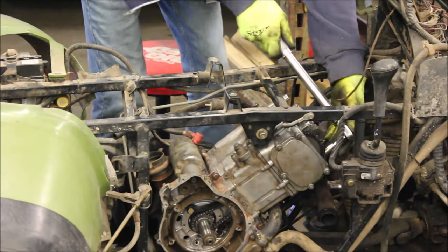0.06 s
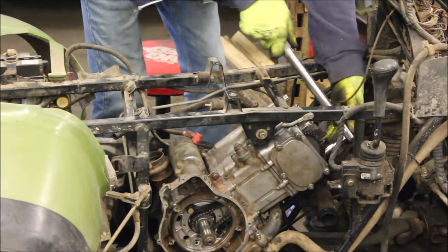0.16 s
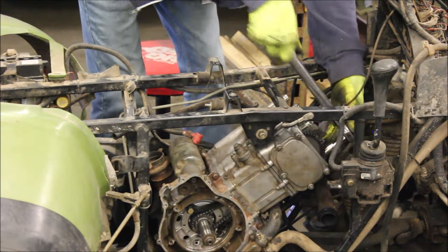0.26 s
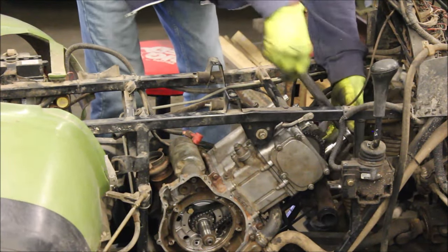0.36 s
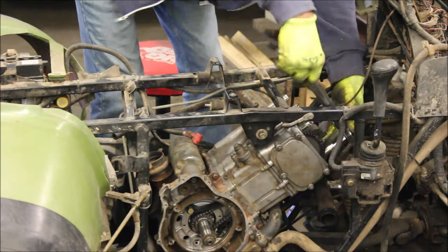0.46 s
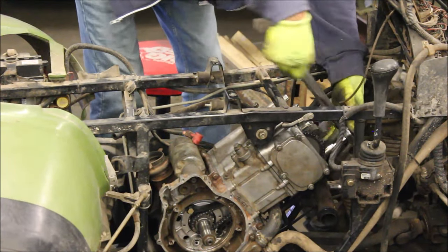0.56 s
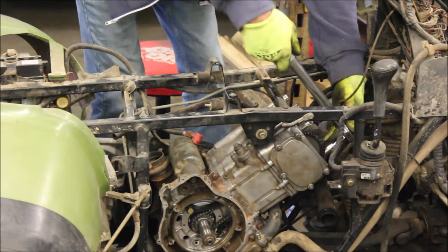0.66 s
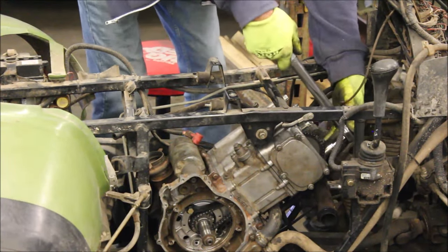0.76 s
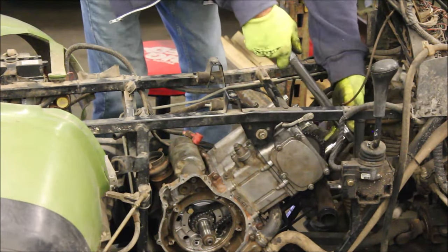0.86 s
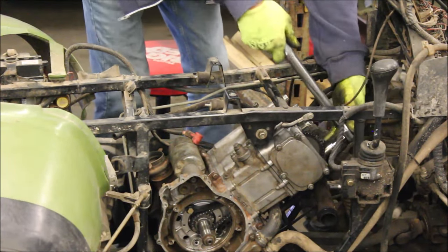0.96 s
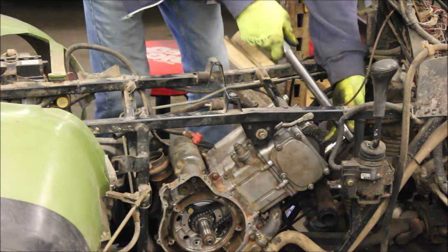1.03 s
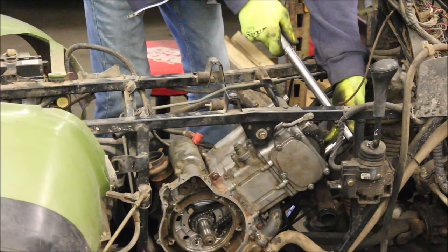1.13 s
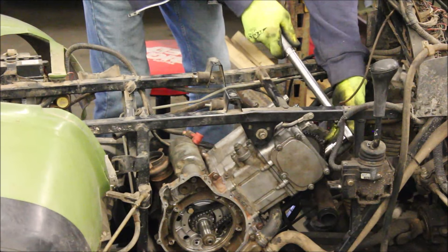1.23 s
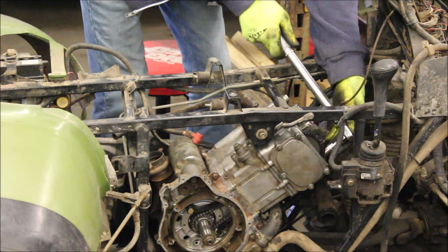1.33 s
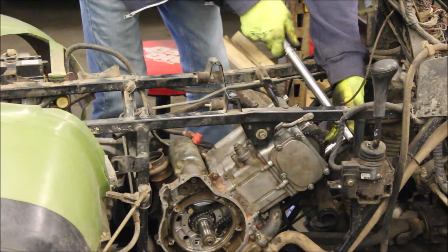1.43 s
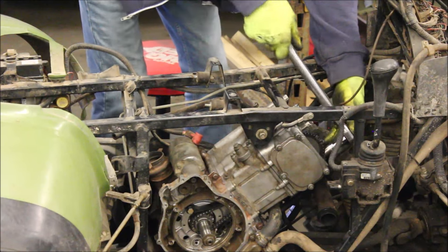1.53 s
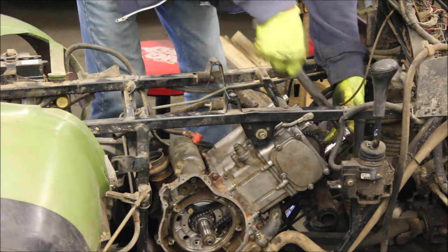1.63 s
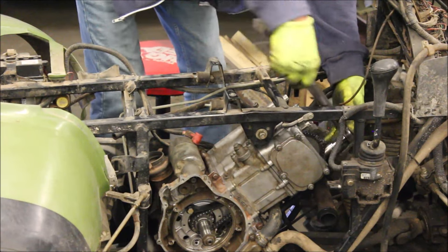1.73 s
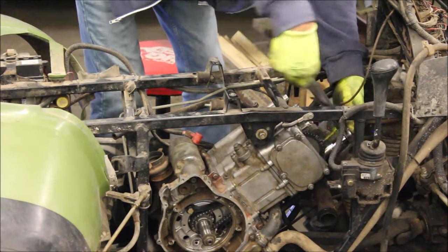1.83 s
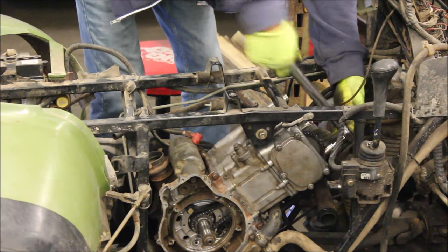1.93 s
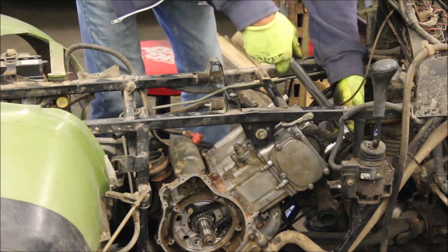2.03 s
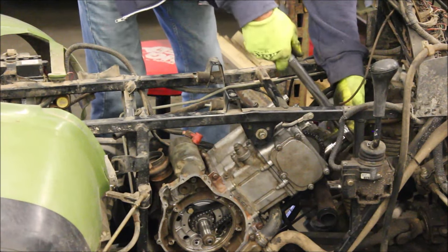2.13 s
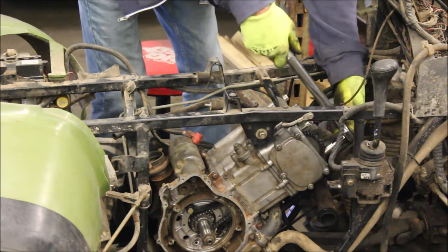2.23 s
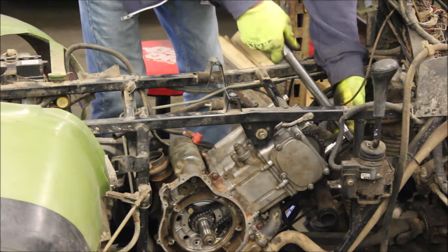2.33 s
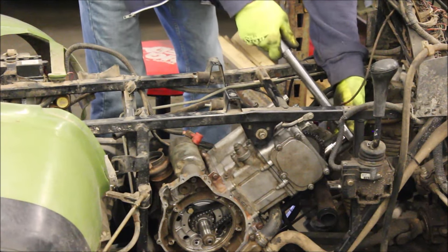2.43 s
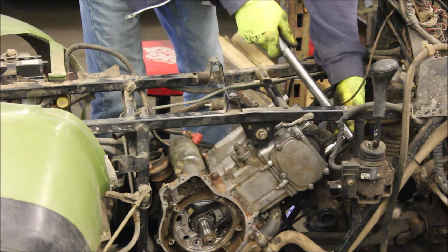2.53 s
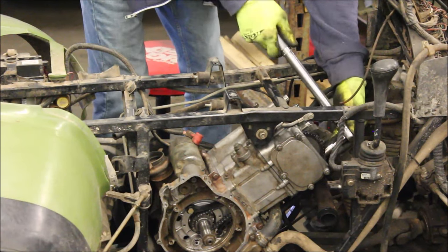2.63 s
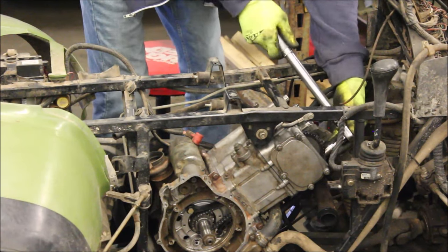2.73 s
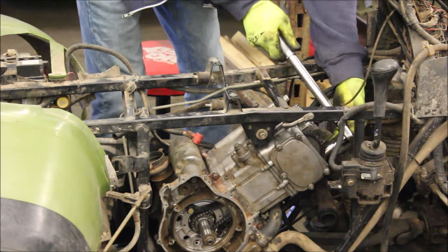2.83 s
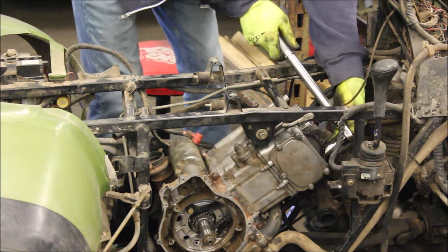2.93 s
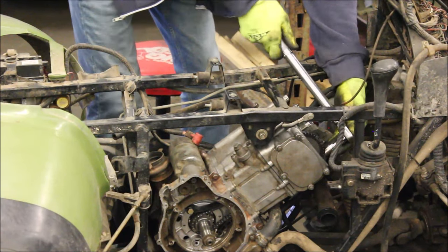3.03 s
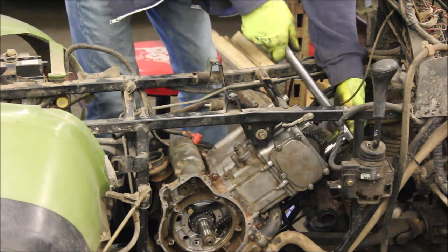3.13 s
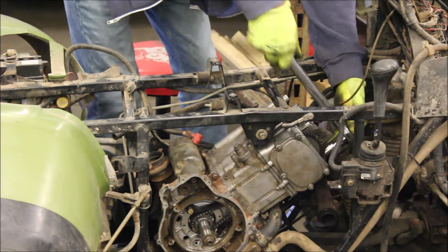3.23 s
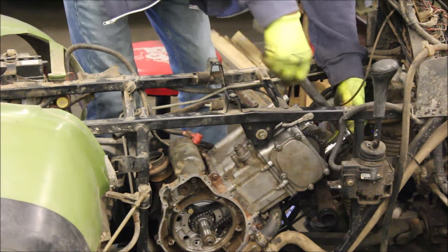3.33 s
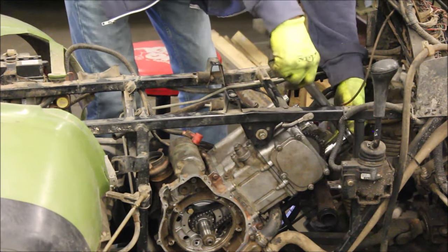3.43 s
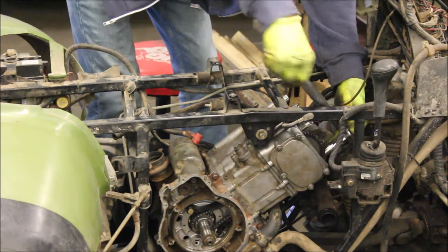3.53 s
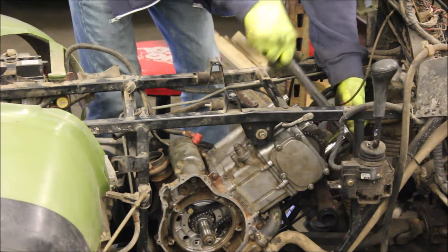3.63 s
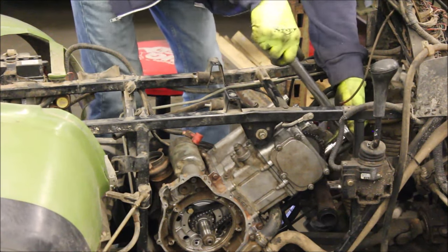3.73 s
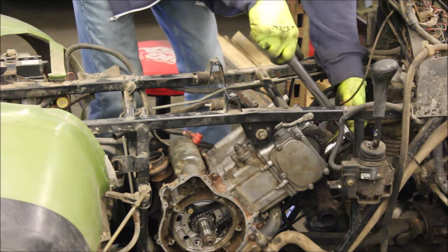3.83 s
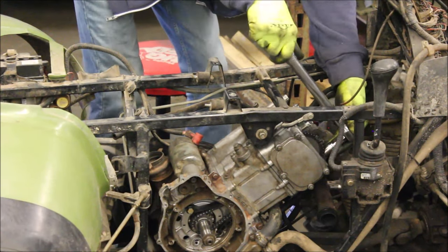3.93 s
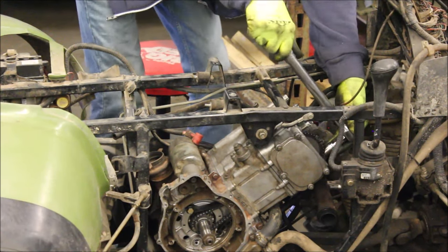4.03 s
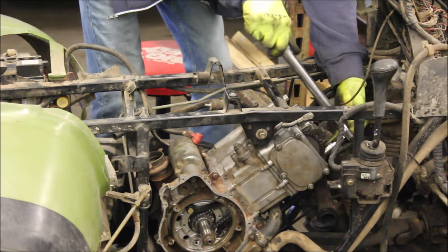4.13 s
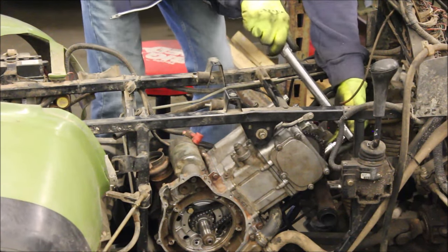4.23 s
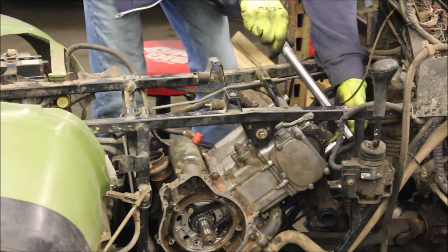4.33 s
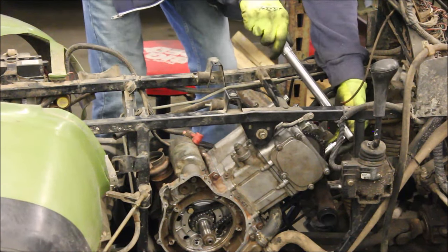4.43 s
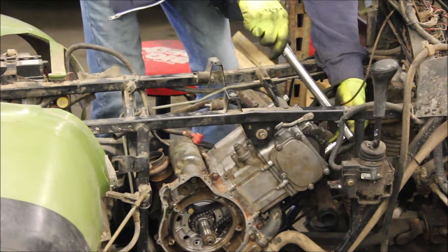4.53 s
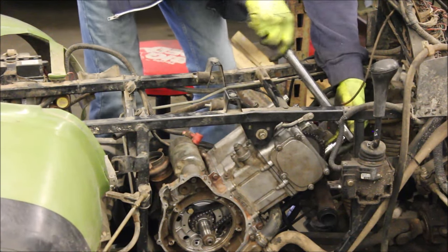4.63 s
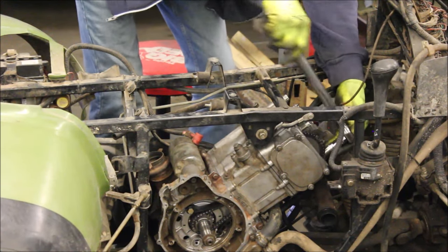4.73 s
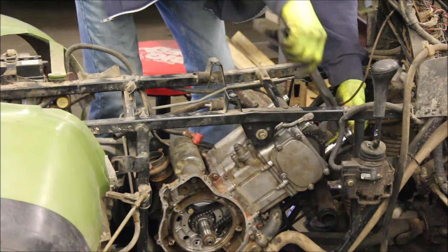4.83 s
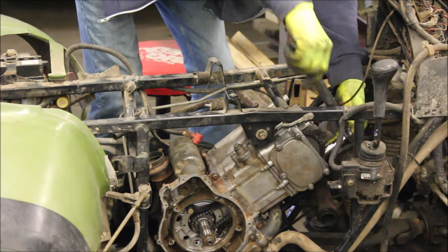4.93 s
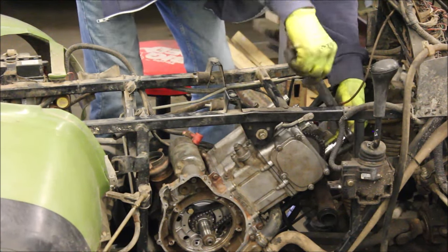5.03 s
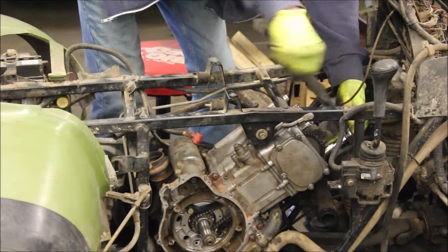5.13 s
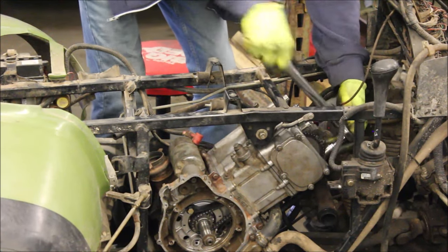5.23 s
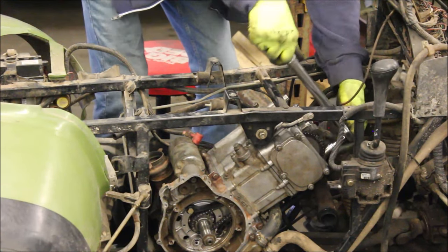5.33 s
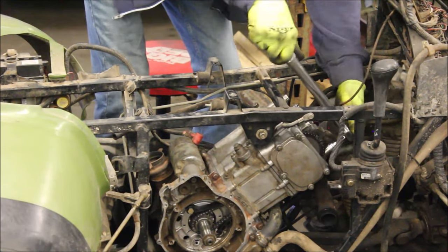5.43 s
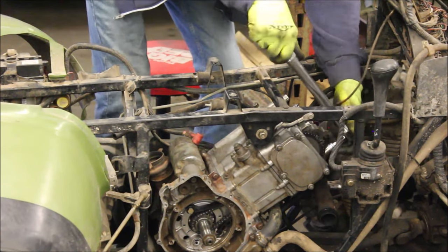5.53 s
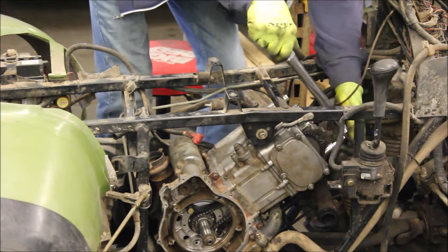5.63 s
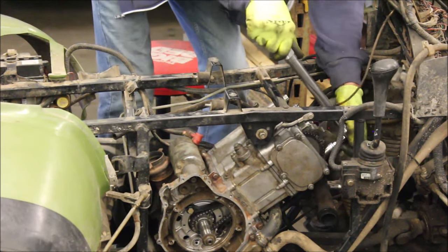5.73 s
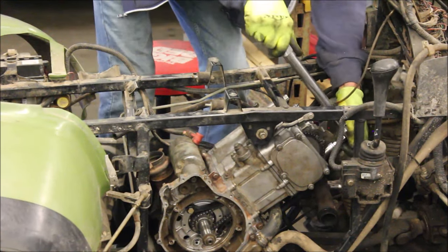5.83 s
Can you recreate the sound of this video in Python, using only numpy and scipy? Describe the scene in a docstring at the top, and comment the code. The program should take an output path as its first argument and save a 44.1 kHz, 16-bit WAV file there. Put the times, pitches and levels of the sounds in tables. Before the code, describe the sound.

A torque wrench gives four loud metallic clacks on an engine bolt, with ratchet ticks, socket clinks and snap-backs ringing in a hard-walled garage.

```python
"""A click-type torque wrench breaks over four times on an engine bolt in a hard-walled garage.
Each loud click is a cluster of broadband impacts that sets the modes of engine and frame ringing.
Before it the socket clinks and the ratchet ticks; after it the wrench snaps back as the hand lets go:
lighter impacts with ringing steel. Shaped noise gives the walls' reverberation, the rubbing of
sleeves and gloves and a steady hiss; wavering sinusoids give a quiet electric hum."""
import sys
import numpy as np
from scipy import signal
from scipy.fft import rfft, irfft
from scipy.io import wavfile
from scipy.ndimage import uniform_filter1d

SR = 44100
rng = np.random.default_rng(int(sys.argv[2]) if len(sys.argv) > 2 else 0)


def to_wav(s):
    """Save 16-bit WAV."""
    ch = np.atleast_2d(s).T  # columns
    pcm = np.round(np.clip(ch, -1, 1) * 32767)  # PCM
    wavfile.write(sys.argv[1], SR, pcm.astype(np.int16))


N = 258867  # length in samples

# Event levels are relative to those in scene(); rubbing and hum levels are absolute.
# the wrench breaks over: start_s, level_db, treble_tilt_db_per_octave, engine_ring_db, frame_knock_db
BREAKS = [(0.466, 1.5, -1, -3, 3), (1.7837, 0, -0.5, -4.5, -5), (3.4636, -1.5, -0.34, -5, -4.5),
          (5.0117, -1.5, -1.5, -4.5, -5)]
# the wrench snaps back, sometimes in two steps: start_s, level_db, treble_tilt_db_per_octave, tube_ring_db
RESETS = [(0.6807, 2, 2.5, 2), (0.6966, 4.5, -3, -1), (1.9968, 3, -1.5, 2), (3.6500, -1.5, -5.5, -2),
          (3.675, -1.5, 1, 1), (5.2845, 4.5, -0.5, 6)]
# the socket clinks on the bolt: start_s, level_db, treble_tilt_db_per_octave
CLINKS = [(0.1517, 1.5, 5.5), (1.4558, 0.5, 2.5), (2.6975, -12, -3.5), (2.809, -14, -4.5),
          (3.0628, -1.5, 2.5), (4.2391, -5, 2.5), (4.6437, -2, 2.5)]


def break_clicks(level_db, touch_db, lag_s, touch_chatter_s, blow_chatter_s,
                 rattle_db, rattle_lag_s, rattle_chatter_s):
    """Successive impacts: the toggle slips, slams into the wall of the tube, and the joints rattle."""
    # colour of the break: frequency_hz, level_db
    break_tone = [(25, -42), (60, -23.5), (190, -12.5), (260, 3), (450, 1), (720, 1.5), (820, -7),
                  (1180, 7), (1380, -2.5), (1750, 7.5), (2400, 5), (3800, -3.5), (5800, -14.5),
                  (10500, -20), (15500, -38.5)]
    out = np.zeros((2, N))
    for start_s, db, tilt_db, _, _ in BREAKS:
        touch = strike(break_tone, tilt_db + 2.5, touch_chatter_s, pivot_hz=2900)
        blow = strike(break_tone, tilt_db, blow_chatter_s, pivot_hz=2640)
        rattle = strike(break_tone, tilt_db + .5, rattle_chatter_s, pivot_hz=2000)
        add(out, start_s, amp(level_db + db + touch_db) * touch)
        add(out, start_s + lag_s, amp(level_db + db) * blow)
        add(out, start_s + rattle_lag_s, amp(level_db + db + rattle_db) * rattle)
    return out


def ringing(engine_db, frame_db):
    """Free vibration: the modes of engine and frame ring on after each break."""
    # modes of the engine: frequency_hz, level_db, t60_s
    engine_modes = [(228, -14, .6), (258, -13, .6), (340, -9, .55), (397, 0, .5), (402, -9, .4),
                    (487, -11, .45), (648, -11, .45), (705, -1, .5), (728, -11, .4), (1122, -11, .4),
                    (1242, -11, .4), (1722, -8, .4), (1947, -7, .4), (2064, -11, .4), (2144, -11, .4),
                    (2282, -6, .45), (2500, -10, .45), (3320, -18, .35), (4800, -24, .3), (5190, -25, .3),
                    (7690, -28, .3)]
    # modes of the frame: frequency_hz, level_db, t60_s
    frame_modes = [(128, -12, .5), (162, -7, .5), (868, 0, .45), (903, -2, .35), (932, -4, .35),
                   (1545, -1, .35), (1602, -1, .35)]
    out = np.zeros((2, N))
    for start_s, _, _, ring_db, knock_db in BREAKS:
        add(out, start_s, amp(engine_db + ring_db) * ring(engine_modes, rise_s=.004, scatter_db=1.5))
        add(out, start_s, amp(frame_db + knock_db) * ring(frame_modes, rise_s=.002, scatter_db=1))
    return out


def strike(tone, tilt_db, chatter_s, pivot_hz, size=4096):
    """Impact excitation: a short burst of contacts is filtered by the response of the steel parts."""
    # sound straight from the wrench, microphone difference against common part: frequency_hz, side_minus_mid_db
    direct_side = [(100, -24), (300, -23), (1000, -17), (2200, -15), (4500, -14), (8000, -11), (14000, -12)]
    ripple_db, ripple_from_hz = 2, 3200
    t, hz = np.arange(size) / SR, abs(np.fft.fftfreq(size, 1 / SR))
    envelope = np.sqrt(t) * np.exp(-t / chatter_s)
    burst = np.fft.fft(rng.standard_normal((2, size)) * envelope)
    force = burst / abs(burst)  # equal at every frequency
    contacts = np.fft.ifft(pair(force, hz, direct_side)).real[:, :size // 2]
    # every blow favours the many small resonances of the steel differently
    knots = np.linspace(0, SR / 2, num=180)
    ripple = np.interp(hz, knots, rng.standard_normal(len(knots)))
    ripple = ripple * np.minimum(hz / ripple_from_hz, 1) ** 2
    octaves = np.log2(np.maximum(hz, 500) / pivot_hz)
    gain = amp(read(tone, hz) + tilt_db * octaves + ripple_db * ripple)
    # minimum phase makes the response causal
    spectrum = np.exp(np.conj(signal.hilbert(np.log(gain))))
    colour = np.fft.ifft(spectrum).real[:size // 2]
    return signal.fftconvolve(contacts, colour[None], axes=1)


def ring(modes, rise_s, scatter_db):
    """Modal superposition: damped sinusoids share the force of each blow a little differently."""
    t, out = np.arange(SR) / SR, 0
    luck_and_phase = rng.standard_normal((len(modes), 2))
    for (hz, db, t60_s), (luck, phase_cycles) in zip(modes, luck_and_phase):
        decay = np.exp(-np.log(1000) * t / t60_s)
        out = out + amp(db + scatter_db * luck) * decay * np.sin(2 * np.pi * (hz * t + phase_cycles))
    return out * (1 - np.exp(-t / rise_s))


def clicks(rows, tone, level_db, chatter_s):
    """Impact excitation: one light strike for each row."""
    out = np.zeros((2, N))
    for start_s, db, tilt_db, *_ in rows:
        add(out, start_s, amp(level_db + db) * strike(tone, tilt_db, chatter_s, pivot_hz=2620))
    return out


def teeth():
    """Pawl kinematics: the handle is drawn back and slows, so most swings tick at growing intervals.

    Each row is start_s, level_db, treble_tilt_db_per_octave, ring_hz, ring_db.
    """
    # pulls of the handle, two in the first swing: first_tick_s, teeth, first_interval_s,
    # interval_growth_per_tooth (ratio), level_db, strongest_ring_hz, ring_db
    swings = [(0.2700, 3, .0372, 1.135, 1.3, 3740, 7), (0.4050, 2, .0465, 1, -1.2, 2690, -3),
              (1.5980, 5, .0397, 1.083, 1.2, 3700, -3), (3.2085, 4, .0484, 1.11, 1.4, 2670, 2),
              (4.8360, 3, .063, 1.328, -0.8, 2820, -5)]
    ring_fade_db, tilt_db = -3.5, -1.2  # per tooth; per octave
    rows = []
    for start_s, count, interval_s, growth, db, hz, ring_db in swings:
        for k in range(count):
            rows.append((start_s, db, tilt_db, hz, ring_db + ring_fade_db * k))
            start_s = start_s + interval_s * growth ** k
    return rows


def ratchet(level_db, chatter_s, seat_db, seat_lag_s, seat_tilt_db, seat_chatter_s):
    """Double impact: each drop of the pawl is followed by a lighter, brighter tap as it seats."""
    # colour of a tick: frequency_hz, level_db
    tick_tone = [(60, -33), (300, -24), (900, -12), (1700, -2.5), (2700, 2), (3200, 0.5), (3750, 4.5),
                 (5800, -0.5), (7000, 4.5), (8300, -4.5), (10500, -2.5), (13000, -10.5), (15800, -20)]
    seats = [(start_s + seat_lag_s, db + seat_db, tilt_db + seat_tilt_db)
             for start_s, db, tilt_db, *_ in teeth()]
    drops = clicks(teeth(), tick_tone, level_db, chatter_s)
    return drops + clicks(seats, tick_tone, level_db, seat_chatter_s)


def ratchet_rings(level_db):
    """Free vibration: the modes of the ratchet head ring after each tick."""
    # modes of the ratchet head: frequency_hz, level_db, t60_s
    head_modes = [(2660, -4, .09), (3735, -2, .14), (5100, -5, .08), (7030, -4, .1), (10420, -9, .1)]
    out = np.zeros((2, N))
    for start_s, db, *_ in teeth():
        add(out, start_s, amp(level_db + db) * ring(head_modes, rise_s=.0004, scatter_db=3.5))
    return out


def grip_pings(level_db, t60_s):
    """Boundary conditions: the grip changes from swing to swing, so each favours another resonance."""
    out = np.zeros((2, N))
    for start_s, _, _, hz, db in teeth():
        add(out, start_s, ring([(hz, level_db + db, t60_s)], rise_s=.0004, scatter_db=1.5))
    return out


def snap_backs(level_db, chatter_s, rattle_db, rattle_chatter_s):
    """Released spring energy: the toggle snaps home and the slack joints rattle on briefly."""
    # colour of a snap back: frequency_hz, level_db
    reset_tone = [(40, -37), (200, -8.5), (1000, -3), (3000, -0.5), (4500, -3), (6500, -9.5), (9000, -14),
                  (10500, -13), (15500, -30)]
    snaps = clicks(RESETS, reset_tone, level_db, chatter_s)
    return snaps + clicks(RESETS, reset_tone, level_db + rattle_db, rattle_chatter_s)


def tube_rings(level_db, t60_s):
    """Free vibration: each snap back rings the resonances of the wrench's tube."""
    # resonances of the tube: frequency_hz, width_hz (not used), level_db
    tube_modes = [(2620, 30, 6), (3070, 28, -1), (3370, 180, 1), (4230, 150, 2), (5180, 50, -8),
                  (5850, 95, -9)]
    modes = [(hz, mode_db, t60_s) for hz, _, mode_db in tube_modes]
    out = np.zeros((2, N))
    for start_s, db, _, ring_db in RESETS:
        add(out, start_s, amp(level_db + db + ring_db) * ring(modes, rise_s=.00044, scatter_db=2))
    return out


def socket(level_db, chatter_s, touch_db, touch_tilt_db, touch_lead_s):
    """Take-up of slack: a light, bright touch of the socket on the bolt, then the clink."""
    # colour of a clink: frequency_hz, level_db
    clink_tone = [(300, 0.5), (900, 6.5), (1450, 8.5), (2100, 4), (4000, -4.5), (5800, -16.5), (9000, -26),
                  (10200, -19), (12000, -41), (15500, -52)]
    touches = [(start_s - touch_lead_s, db + touch_db, tilt_db + touch_tilt_db)
               for start_s, db, tilt_db in CLINKS]
    return clicks([*CLINKS, *touches], clink_tone, level_db, chatter_s)


def socket_rings(level_db):
    """Free vibration: the modes of the socket ring after each clink."""
    # modes of the socket: frequency_hz, level_db, t60_s
    socket_modes = [(1437, 0, .15), (1700, -6, .13), (2471, -9, .17), (2767, -5, .22), (3844, -18, .25),
                    (4140, -13, .15), (9878, -17, .17)]
    out = np.zeros((2, N))
    for start_s, db, _ in CLINKS:
        add(out, start_s, amp(level_db + db) * ring(socket_modes, rise_s=.001, scatter_db=1))
    return out


def crossfaded(x, turns_per_s, count=3):
    """Crossfaded sends: the sound is passed in turn to several reverberation tails."""
    turn = np.arange(N) / SR * turns_per_s
    return [x * np.sin(np.pi / 2 * np.minimum((turn + k) % count, 2)) for k in range(count)]


def garage(x, build_s, early_db, early_decay_s, size=65536):
    """Diffuse reverberation: a noise tail builds up, then dies at its own speed in each band."""
    # reverberation time: frequency_hz, t60_s
    room_t60 = [(120, 0.78), (400, 0.95), (1000, 0.92), (2200, 1.0), (4500, 0.78), (8000, 0.58),
                (15000, 0.27)]
    # level of the tail: frequency_hz, level_db
    room_db = [(120, 9.5), (400, 5), (1000, 1.5), (2200, 0.5), (4500, 2.5), (8000, -1), (15000, -7)]
    # sound from the walls, microphone difference against common part: frequency_hz, side_minus_mid_db
    room_side = [(100, -21), (300, -24), (600, -12.5), (1100, -12), (2200, -6), (4500, -5.5), (7500, -1.5),
                 (11000, 2)]
    t = np.arange(size) / SR
    near_walls = 1 + amp(early_db) * np.exp(-t / early_decay_s)  # they answer strongest
    swell = (1 - np.exp(-t / build_s)) * near_walls
    hz, age_s, bands = signal.stft(rng.standard_normal((2, size)) * swell, SR, nperseg=256)
    bands = bands * np.exp(-np.log(1000) * age_s / read(room_t60, hz)[:, None])
    tail = rfft(signal.istft(bands, SR, nperseg=256)[1][:, :size])
    hz = np.fft.rfftfreq(size, 1 / SR)
    # smooths the tail's fine spectrum, so the reverberation has an even colour
    tail = tail / np.sqrt(uniform_filter1d(abs(tail) ** 2, size=41))
    tail = irfft(pair(tail, hz, room_side) * amp(read(room_db, hz)), size)[:, :SR]
    return signal.fftconvolve(x.mean(0)[None], tail, axes=1)[:, :N]


def rubbing(grain_db):
    """Stick-slip friction: cloth noise swells with each arm move and catches in small uneven grains."""
    # colour of the cloth: frequency_hz, level_db
    rub_tone = [(150, 4), (500, 0.5), (1200, -3), (2800, -6), (6000, -16.5), (11000, -22.5), (15500, -56)]
    # moves of sleeves and gloves: middle_s, half_length_s, level_db
    rubs = [(0.15, .35, -55), (1.05, 0.22, -54.5), (2.052, 0.43, -57.5), (2.773, 0.08, -57.5),
            (3.13, 0.093, -52.5), (4.24, 0.064, -50), (4.25, 0.21, -54.5)]
    rest_db = -63.5  # the cloth is never quite still
    t = np.arange(N) / SR
    grain = evened(uniform_filter1d(rng.standard_normal(N), size=400))
    power = amp(rest_db) ** 2
    for middle_s, half_s, db in rubs:
        power = power + amp(db) ** 2 * np.exp(-((t - middle_s) / half_s) ** 2)
    return noise(N, rub_tone) * np.sqrt(power) * amp(grain_db * grain)


def background(hiss_db, waver_rad):
    """Stationary noise and phase modulation: a steady hiss and a slightly wavering mains hum."""
    # colour of the hiss, strongest in the bass: frequency_hz, level_db
    hiss_tone = [(12, -44), (25, -22), (45, -11), (90, -5.5), (122, -10.5), (202, -12), (245, -8.5),
                 (324, -10), (362, -8), (452, -15.5), (597, -20), (686, -14.5), (1340, -18), (1670, -20.5),
                 (5230, -27), (15500, -37.5)]
    # partials of the hum: frequency_hz, rms_level_db
    hum_partials = [(60, -71.5), (119.5, -64), (296, -95), (360, -64.5), (598, -73.5), (840, -74.5),
                    (1260, -72)]
    t, knots = np.arange(N) / SR, np.linspace(0, N / SR, num=30)
    hum = 0
    for hz, db in hum_partials:
        phase = waver_rad * np.interp(t, knots, rng.standard_normal(len(knots)))
        hum = hum + amp(db) * np.sin(2 * np.pi * hz * t + phase)
    return amp(hiss_db) * noise(N, hiss_tone) + np.sqrt(2) * hum


def noise(size, tone):
    """Shaped stereo noise: a wide steady hiss, little alike in the two channels above the bass."""
    # difference of the channels against their common part: frequency_hz, side_minus_mid_db
    noise_side = [(50, -16), (150, -1.5), (300, -4), (600, -1), (15000, 1)]
    hz = np.fft.rfftfreq(size, 1 / SR)
    spectra = pair(rfft(rng.standard_normal((2, size))), hz, noise_side)
    return evened(irfft(spectra * amp(read(tone, hz)), size))


def pair(z, hz, width):
    """Mid-side stereo: two unrelated spectra become common part and difference of two channels."""
    side = z[1] * amp(read(width, hz))
    return np.array([z[0] + side, z[0] - side])


def amp(db):
    """Logarithmic level: decibels to amplitude gain."""
    return 10 ** (np.asarray(db) / 20)


def evened(x):
    """Power normalisation: scales to an rms of one."""
    return x / np.sqrt(np.mean(x ** 2) + 1e-20)


def read(points, hz):
    """Log-frequency interpolation: joins (frequency_hz, value) points."""
    f, value = np.transpose(points)
    return np.interp(np.log(hz + 1), np.log(f), value)


def add(mix, start_s, sound):
    """Linear superposition: lays a sound into the mix at its start time."""
    part = mix[:, round(start_s * SR):][:, :sound.shape[-1]]
    part += sound[..., :part.shape[1]]


def scene():
    """Superposition of direct sound, ringing, reverberation, rubbing and background."""
    loud = break_clicks(level_db=14, touch_db=-4, lag_s=.0045, touch_chatter_s=.0038,
                        blow_chatter_s=.0022, rattle_db=-8.5, rattle_lag_s=.013,
                        rattle_chatter_s=.0036)
    ticks = ratchet(level_db=-6.5, chatter_s=.0036, seat_db=-5, seat_lag_s=.0125,
                    seat_tilt_db=1.5, seat_chatter_s=.0032)
    resets = snap_backs(level_db=-5.5, chatter_s=.0029, rattle_db=1.5, rattle_chatter_s=.015)
    clinks = socket(level_db=-14.5, chatter_s=.0062, touch_db=-12, touch_tilt_db=5.5,
                    touch_lead_s=.0245)
    steel = ratchet_rings(level_db=-47.5) + socket_rings(level_db=-43.5)
    # each source excites the room by its own share
    sent = loud + amp(-2) * ticks + amp(1) * resets + amp(.9) * clinks + amp(-5) * steel
    far = sum(garage(share, build_s=.015, early_db=2, early_decay_s=.03)
              for share in crossfaded(sent, turns_per_s=23))
    rings = ringing(engine_db=-21.5, frame_db=-32) + steel
    rings = rings + grip_pings(level_db=-35.5, t60_s=.047) + tube_rings(level_db=-42, t60_s=.046)
    mix = loud + ticks + resets + clinks + rings + far
    mix = mix + rubbing(grain_db=2) + background(hiss_db=-53.5, waver_rad=.49)
    return mix * amp([[.25], [-.25]])  # channel gains in dB


def record(dry):
    """Band limitation: a linear-phase low-pass filter removes the highest treble."""
    edge_hz = 15900
    low_pass = signal.firwin(511, edge_hz, window=("kaiser", 9), fs=SR)
    return signal.oaconvolve(dry, low_pass[None], "same")


dry = scene()
out = record(dry)
to_wav(out)
```